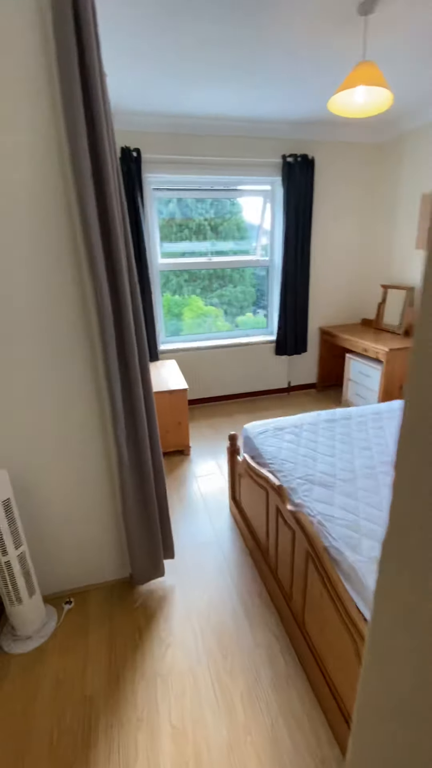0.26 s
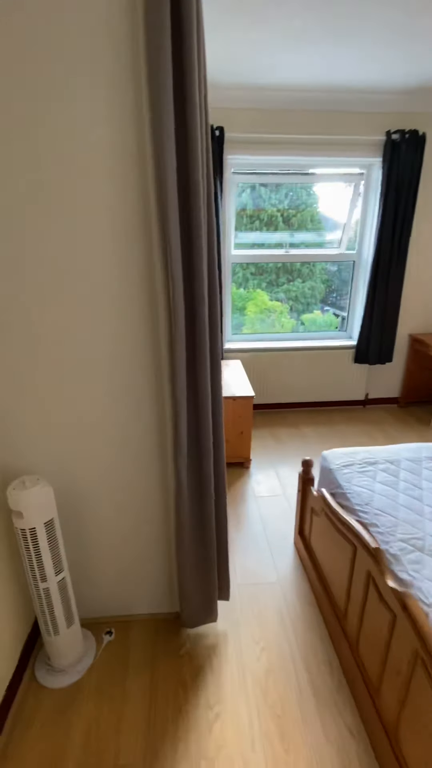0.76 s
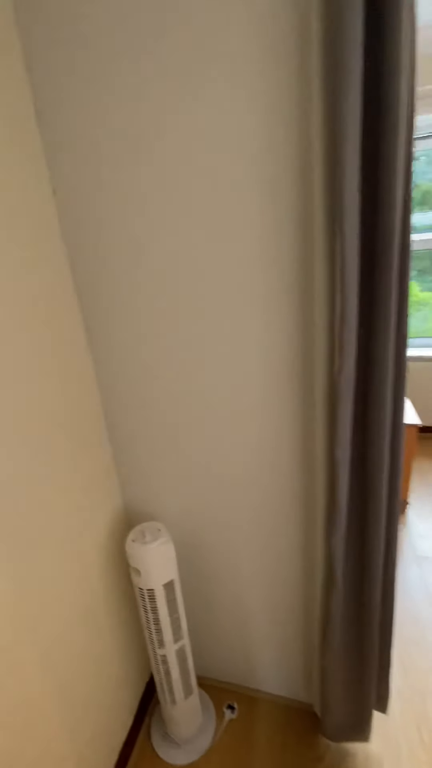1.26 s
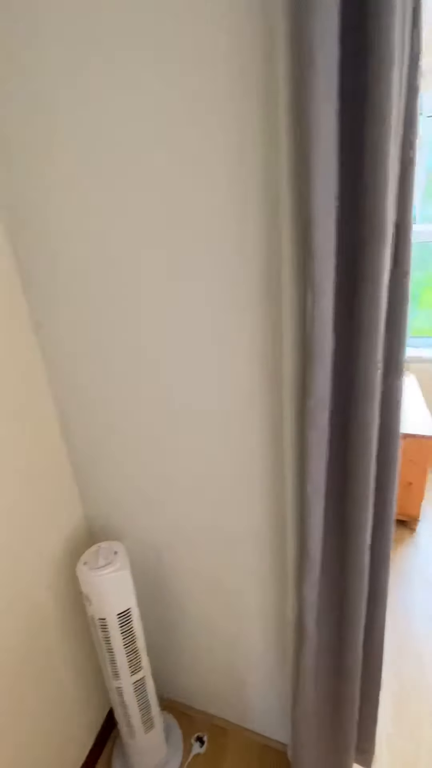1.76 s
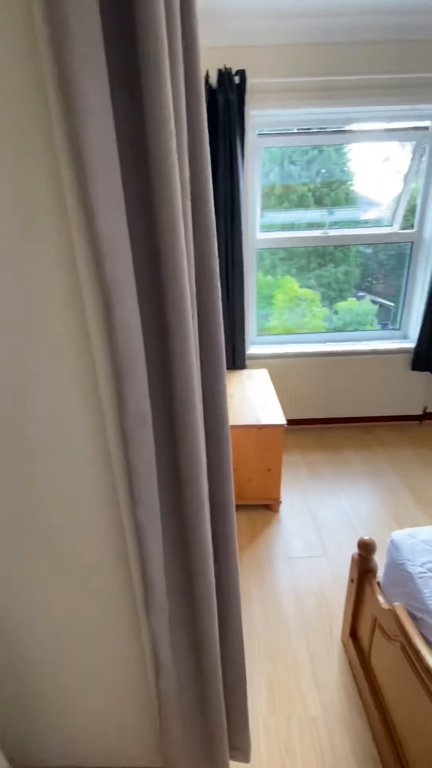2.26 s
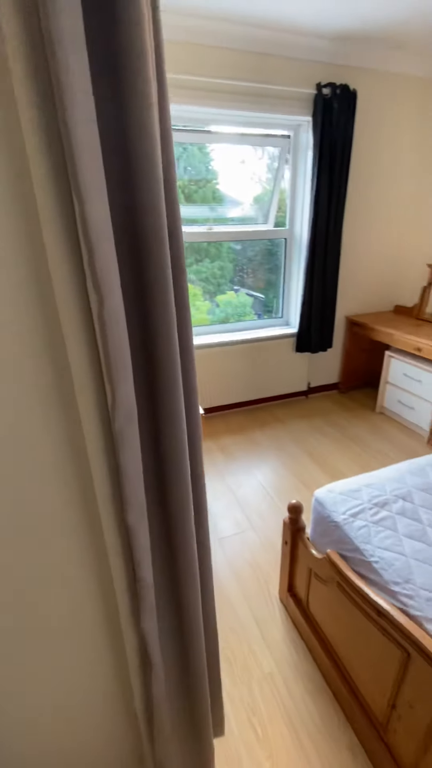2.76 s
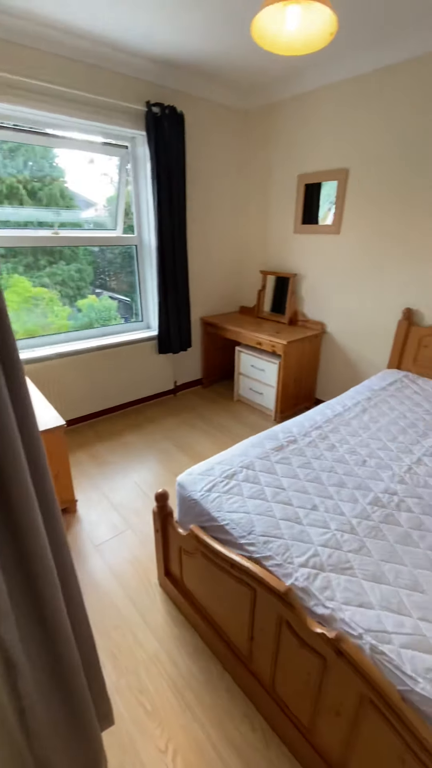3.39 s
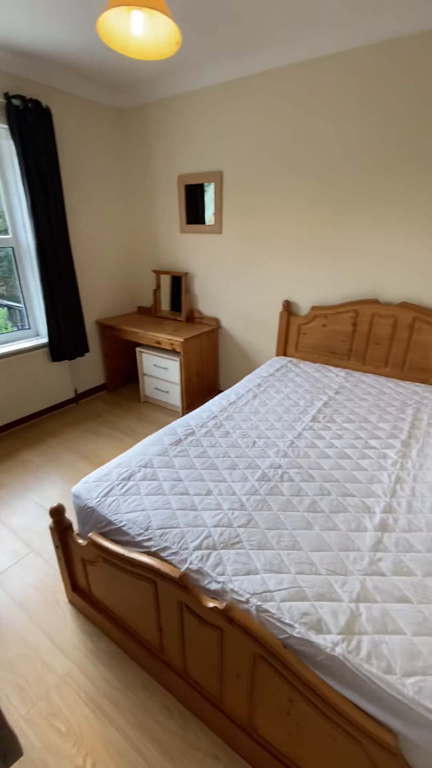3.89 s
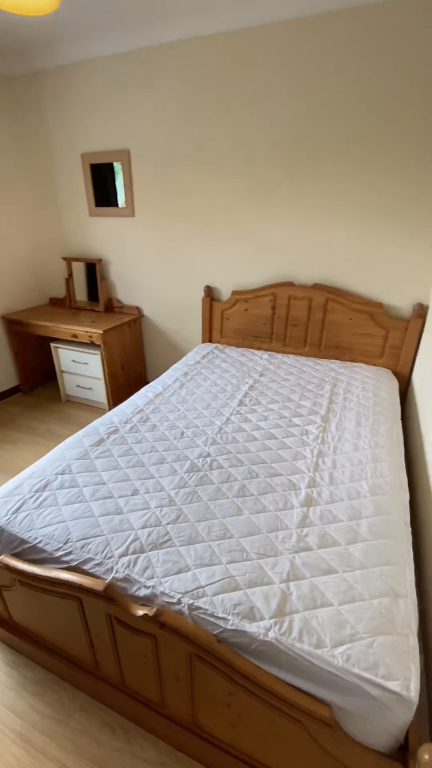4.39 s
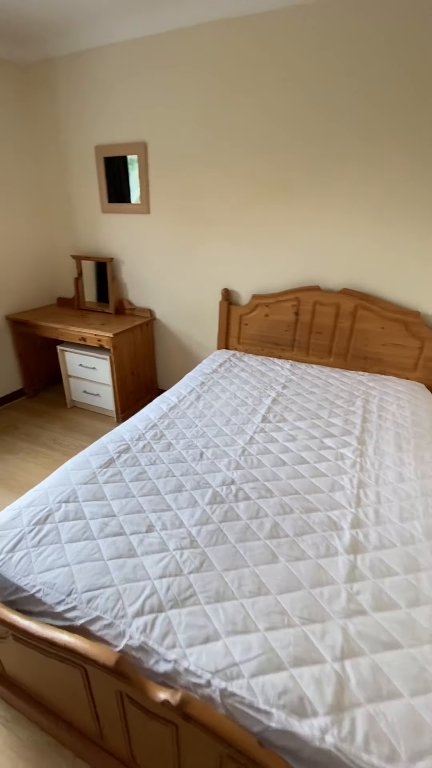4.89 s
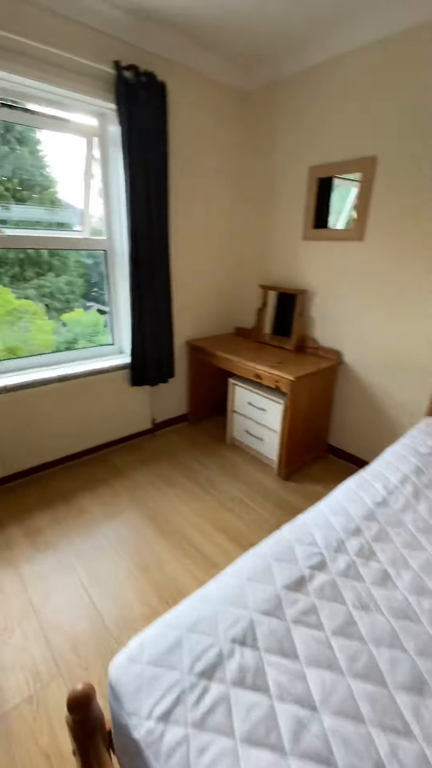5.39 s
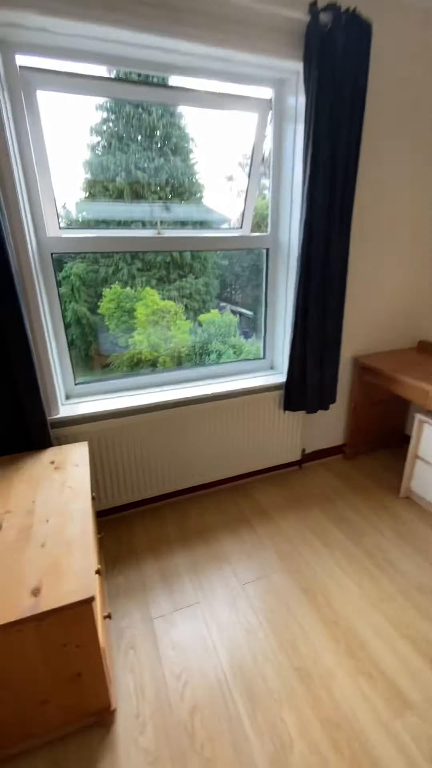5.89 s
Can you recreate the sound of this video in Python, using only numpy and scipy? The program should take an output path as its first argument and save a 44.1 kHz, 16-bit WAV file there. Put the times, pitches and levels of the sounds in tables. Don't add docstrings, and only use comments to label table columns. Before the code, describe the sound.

Soft-shoed footsteps knock and thump on a hollow laminate floor in a bare bedroom, pause, then resume, over faint distant traffic hum.

```python
import sys
import numpy as np
from scipy import signal
from scipy.fft import rfft, irfft, next_fast_len
from scipy.io import wavfile
from scipy.ndimage import uniform_filter1d

SR = 44100
rng = np.random.default_rng(int(sys.argv[2]) if len(sys.argv) > 2 else 0)


def nominal_scale(level):
    x = np.asarray(level, float) / 20
    return 10 ** x


def persist_wave(psi):
    counts = np.round(np.clip(psi, -1, 1) * 32767).astype(np.int16)
    wavfile.write(sys.argv[1], SR, np.atleast_2d(counts).T)


N = 270979

# f/Hz, level/dB
STREET_COLOUR = [(12, -30), (20, -11.5), (54, -1), (76, -10.5), (153, -13), (185, -19.5), (217, -17),
                 (291, -16), (324, -32), (497, -24), (632, -41), (945, -26), (1850, -43), (5530, -54.5),
                 (12500, -49.5), (15600, -72)]
# t/s, level/dB
CAR_PASSING = [
    (0, 0),
    (3.3, -2),
    (3.55, -3),
    (4.0, 1),
    (4.35, 2),
    (4.7, -1),
    (6.14, 0),
]
# f/Hz, time to fade 60 dB/s, level/dB
ROOM_RING = [(59, 0.8, -15.5), (150, 0.62, -13), (407, 0.35, -2.5), (965, 0.27, -5), (2700, 0.35, -5.5),
             (6370, 0.25, -9), (9900, 0.22, -14.5)]
# f/Hz, phase/rad
LEFT_LEAD = [(0, 0), (500, .25), (1210, 2.1), (1800, .6), (3000, 2.6), (4000, .5), (4550, 1.8), (4850, 3.2),
             (5200, 6.1), (7060, 7.5), (9300, 8), (11700, 9.5)]
# f/Hz, share/0-1
DIFFERENT_SHARE = [(60, 0.04), (150, 0), (300, 0.1), (550, 0.68), (1500, 0.98), (4200, 0.77), (4850, 0.53),
                   (5500, 0.49), (12000, 0.38)]
# f/Hz, level/dB
MIC_RESPONSE = [(20, -15), (33, -5), (45, 2), (8000, 1.58), (10000, -1), (11000, 0.5), (12200, -5),
                (12800, -10)]

# peak t/s, level/dB, time to fade 20 dB/s
HOUSE_SWAYS = [(.56, -62, -1.5), (.72, -55, 0), (.92, -47, 0.1), (1.28, -51, 0.55), (1.6, -45, 0.2),
               (1.83, -53, 0.9), (2.14, -54, 0), (2.68, -53, 0.3), (3.21, -56, .5), (3.56, -66.5, 3.5),
               (4.02, -62, 0.3), (5.06, -45, 0.04), (5.25, -46.5, .5), (5.85, -45, 0.24),
               (6.08, -46.5, 0.3)]
# t/s, level/dB
FLOOR_LOAD = [(0, -8), (.3, -10), (.7, 0), (2.5, 0), (2.95, -16), (3.2, -7), (3.45, -16), (4.75, -9.5),
              (5.1, -1), (5.55, -7), (5.85, 2.5), (6.14, 2)]
# f/Hz, level/dB
CLOTH_COLOUR = [(1470, -66), (2500, -6), (3960, -6), (4730, -7), (5150, -2), (5830, -5.5), (9300, -12.5),
                (10500, -11), (12000, -21), (15600, -28)]
# peak t/s, hiss level/dB, time to fade 20 dB/s, coarse rub over hiss/dB
LEG_SWINGS = [(0.0, -59, 0.18, 3), (.46, -61, 0.12, -0.5), (.83, -55.5, 0.41, -1.5), (1.52, -70.5, 0.83, 9),
              (1.999, -80, 0.42, 19.5), (2.3, -79, 0.07, 29), (2.49, -68, 0.27, -15), (2.601, -59, 0.14, 4),
              (2.93, -74, 0.05, 6.5), (3.08, -79, 0.02, 17), (4.5, -74.5, 0.09, 3.5),
              (4.83, -76.5, 0.23, 8.5), (5.06, -64.5, 0.15, 7), (5.23, -62, 0.21, 1.5),
              (5.4, -69.5, 0.2, 1), (5.76, -82, 0.21, 21), (5.92, -66, 0.35, -1.5), (6.14, -63, 0.31, 2.5)]
# peak t/s, level/dB, f/Hz, width/octaves, time to fade 20 dB/s
FLEX_CREAKS = [(.15, -71, 680, .15, .4), (1.56, -64, 1240, 0.095, .2), (1.52, -70, 3450, .08, 0.15),
               (2.93, -74.5, 3270, .1, .12), (3.29, -79, 3350, .09, .08), (3.22, -60, 1900, 0.55, 0.075),
               (3.65, -82, 3300, .2, .04), (4.47, -78, 3500, .17, .22), (4.5, -73.5, 5100, 0.44, -0.02),
               (1.85, -51, 750, .55, .08), (1.24, -50, 300, .25, .05), (2.5, -45, 142, .12, 0.11),
               (5.88, -48, 190, .2, .08), (6.068, -55, 11500, .06, 0.24), (5.12, -55, 1500, 0.5, 0.0639),
               (3.3, -60, 400, .5, .08), (5.79, -57, 5400, .15, .03), (5.23, -61, 5600, .08, .05),
               (2.07, -62, 770, .12, .06), (2.12, -62, 1000, .7, .12), (2.225, -57, 130, .3, .06),
               (.78, -66, 11000, .35, .04), (1.83, -50, 2500, .6, .025), (5.96, -62, 9500, .3, .08),
               (5.725, -57, 8500, .4, .055), (5.73, -47, 550, .5, .07), (5.97, -53, 250, .4, .12),
               (2.495, -50, 850, .5, .03), (.93, -62, 6000, .2, .15)]
# t/s, peak level/dB, start f/Hz, end f/Hz, length/s
SINGING_STRANDS = [(1.99, -47, 480, 425, .055), (2.03, -50, 800, 745, .07), (2.04, -53, 930, 850, .05),
                   (2.05, -52, 1010, 985, .04), (2.1, -57, 770, 680, .06), (2.15, -57, 760, 770, .04),
                   (2.165, -53, 300, 300, .035), (2.16, -55, 480, 560, .045), (2.205, -54, 310, 295, .045),
                   (1.985, -47, 990, 950, .04), (1.815, -46, 1050, 1000, .04), (1.83, -47, 800, 720, .035),
                   (1.1545, -32, 960, 910, .02), (1.18, -38, 560, 550, .025), (1.19, -40, 350, 330, .035),
                   (1.195, -44, 780, 760, .025), (1.233, -39, 270, 250, .016), (1.234, -34, 170, 140, .03),
                   (5.0715, -30, 710, 690, .011), (5.078, -35, 285, 270, .03), (5.08, -28, 135, 130, .024),
                   (5.1, -39, 660, 640, .028), (5.118, -40, 515, 490, .04), (5.12, -39, 305, 295, .025),
                   (5.2, -35, 170, 175, .03), (5.18, -41, 95, 92, .045), (3.18, -33, 300, 280, .03),
                   (3.181, -38, 470, 450, .024), (5.684, -51, 2620, 2580, .024), (5.8, -40, 520, 480, .014),
                   (5.81, -36, 110, 100, .03), (3.178, -30, 160, 145, .036), (3.172, -47, 1260, 1250, .02),
                   (3.04, -38, 160, 150, .045), (3.072, -55, 660, 650, .028), (1.162, -30, 190, 170, .016),
                   (5.072, -32, 480, 460, .011), (1.784, -39, 650, 640, .022), (.5685, -42, 560, 540, .02),
                   (5.128, -35, 150, 145, .025)]

# t/s, peak level/dB, f/Hz, left over right/dB
CRUSHED_GRIT = [(.2615, -60, 2500, 0), (1.3465, -46, 4500, 0), (2.676, -52, 8000, -2), (3.231, -45, 650, 0),
                (5.787, -42, 3200, 0), (5.794, -43, 2000, 0), (5.802, -41, 2800, 0), (5.815, -42, 2200, 0),
                (5.855, -39, 3000, 0), (1.829, -40, 2200, 0), (4.46, -66, 3400, 0), (4.51, -64, 3600, 0)]
# t/s, peak level/dB, f/Hz, left over right/dB
GRIT_TICKS = [(0.1287, -49.5, 2920, 0), (0.2627, -48.5, 3070, 0), (0.5697, -39.5, 2620, -5),
              (0.6303, -50, 6500, -2), (0.673, -55, 2600, 1), (0.72, -41, 5000, -6), (1.3471, -48, 4170, 0),
              (2.204, -48.5, 3050, 1), (2.531, -49, 5300, 7), (2.7927, -57.5, 3800, 8),
              (3.042, -56, 4290, 4), (3.641, -59, 5400, -0.5), (4.7583, -51.5, 4560, -1.0),
              (4.8224, -59, 6920, 0), (5.077, -42, 4500, 0), (5.1779, -35.5, 3100, 5.5),
              (5.435, -47.5, 4320, -8), (5.682, -36, 2510, 4), (5.7395, -43, 4930, -1.0),
              (5.8538, -36.5, 3070, -1.5), (6.058, -38.5, 6100, 9)]
# t/s, peak level/dB, slip rate f/Hz, length/s
RUBBER_SQUEAKS = [
    (1.979, -35, 870, 0.031),
    (1.9, -57, 860, 0.021),
    (1.82, -44, 1090, 0.021),
]
# f/Hz, level/dB
OVERTONE_LEVELS = [(400, -12), (900, -3), (1740, -2.5), (3500, 1), (5200, -10), (8000, -17)]
# t/s, peak level/dB, f/Hz, length/s
LOOSE_BOARDS = [(.467, -36, 176, 0.036), (.572, -31.5, 150, 0.032), (1.1555, -31.5, 545, 0.0097),
                (1.784, -30.5, 445, 0.024), (2.481, -40, 163, 0.025), (3.18, -35, 190.6, 0.025),
                (5.68, -48, 2600, 0.012), (5.683, -40, 603, 0.0093), (5.703, -34, 172, .036),
                (2.27, -38, 150, .035), (1.785, -38, 870, .02), (1.163, -34, 260, .014)]
# t/s, peak level/dB, f/Hz, time to fade 60 dB/s
SOLE_SLAPS = [(0.0044, -43.5, 5070, 0.07), (0.4672, -41.5, 2400, 0.098), (0.568, -34.5, 2700, 0.059),
              (0.7245, -42, 4300, 0.09), (1.1565, -29.5, 2170, 0.11), (1.3456, -44.5, 3800, 0.081),
              (1.826, -36.5, 2060, 0.087), (1.9773, -28, 2400, 0.095), (2.045, -46, 2150, 0.15),
              (2.2047, -41.5, 1970, 0.1), (2.261, -37, 2200, 0.1), (2.2607, -38, 4900, 0.18),
              (2.477, -45.5, 2550, 0.17), (2.532, -38, 4770, 0.087), (3.173, -48, 1500, 0.1),
              (4.8237, -47.5, 1800, 0.15), (4.825, -51.5, 5900, 0.16), (5.004, -47, 5850, 0.096),
              (5.0734, -29, 2330, 0.065), (5.1758, -40.5, 3830, 0.1), (5.2, -51.5, 5560, 0.17),
              (5.3293, -54.5, 5350, 0.15), (5.68, -42, 2700, 0.47), (5.7857, -47.5, 5000, 0.19),
              (5.797, -44, 2500, 0.14), (6.0576, -39.5, 6300, 0.1)]
# t/s, peak level/dB, f/Hz, width/octaves, time to fade 60 dB/s
SOLE_DRAGS = [(.974, -48, 9500, 0.84, 0.26), (1.1793, -38.5, 2150, 1, .26), (1.158, -41.5, 5400, 0.62, 0.4),
              (1.7826, -39.5, 1850, 0.83, 0.31), (1.782, -51.5, 6800, 0.5, 0.29),
              (2.045, -49, 900, 0.6, 0.41), (2.172, -46.5, 450, 0.6, 0.28), (2.665, -45, 5900, 0.69, 0.098),
              (3.0348, -42.5, 3860, .99, 0.25), (2.185, -49.5, 640, 0.34, .2),
              (5.073, -31.5, 700, 0.6, 0.22), (6.057, -35, 10600, 0.28, 0.17)]

# t/s, peak level/dB, board pitch f/Hz, hard edge over knock/dB
FOOT_KNOCKS = [(0.465, -37.5, 436, -14.5), (0.507, -56, 425, -2), (0.569, -35.5, 562, -30),
               (0.811, -45.5, 420, -12), (1.156, -25, 485, -3.5), (1.189, -32, 338, -9),
               (1.238, -42, 492, -24), (1.788, -32, 447, -8), (1.822, -43.5, 760, 2.5),
               (1.984, -37.5, 457, -2.5), (2.04, -43.5, 688, 0), (2.261, -47.5, 637, -7),
               (2.482, -38, 644, -4), (2.529, -44.5, 563, -23), (3.041, -45, 643, -28),
               (3.174, -35, 354, -4), (3.184, -26, 333, -14), (3.231, -42, 332, -3), (4.519, -60, 394, -11),
               (4.825, -45, 347, -4.5), (5.005, -42.5, 453, -14), (5.073, -24, 329, -7),
               (5.104, -31.5, 517, -9), (5.177, -39, 579, -26), (5.68, -31, 437, -23),
               (5.705, -33.5, 398, -31), (5.801, -34, 335, -14.5), (5.864, -53, 500, -20)]
# t/s, subfloor thump level/dB, beam boom level/dB
WEIGHT_LANDINGS = [(0.466, -34.5, -61), (0.507, -47, -54), (0.569, -31, -42), (0.624, -40, -43),
                   (0.811, -39, -58), (1.156, -35, -31.5), (1.186, -45, -41), (1.238, -40, -35),
                   (1.824, -46, -43), (1.983, -54.5, -53), (2.261, -37, -35.5), (2.48, -37, -65.5),
                   (2.689, -61, -42.5), (3.041, -47, -51), (3.172, -41, -39.5), (3.186, -41, -46),
                   (3.231, -52, -52), (3.819, -64, -48.5), (3.911, -67, -52), (4.519, -51.5, -63),
                   (4.824, -48.5, -46), (5.004, -44.5, -63), (5.072, -29, -35), (5.1, -27.5, -36),
                   (5.177, -41, -38), (5.241, -46, -33.5), (5.68, -36, -52), (5.705, -35, -46),
                   (5.788, -36, -31), (5.812, -36, -34)]
# multiple of the board pitch, level/dB, time to fade 60 dB/s
BOARD_TONES = [(.6, -5, 0.068), (.72, -7.5, 0.068), (.86, -5.5, 0.057), (1.01, -2, 0.076),
               (1.15, -2, 0.042), (1.32, -4.5, 0.031), (1.55, -3, 0.029)]
# f/Hz, level/dB, time to fade 60 dB/s
EDGE_TONES = [(693, -0.9, 0.04), (783, -0.5, 0.047), (940, -3, 0.064), (1052, 0.5, 0.032),
              (1273, -7, 0.035), (1530, -10, 0.026), (1850, -4, 0.014), (2200, -24, 0.0062)]
# f/Hz, level/dB, time to fade 60 dB/s
SUBFLOOR_TONES = [(110.3, -6.5, 0.16), (142.3, 1, 0.12), (173.7, -5.5, 0.13), (211.6, -6.5, 0.098),
                  (270.2, -7, 0.055)]
# f/Hz, level/dB, time to fade 60 dB/s
BEAM_TONES = [(47.1, -7.5, 0.63), (57.3, 1.5, 0.26), (70.3, -10, 0.11)]

KNOCK_PAN_DB, SCUFF_PAN_DB = 4, 0
SLOW_T = np.linspace(0, N / SR, num=1200)


def on_log(hz, table):
    table_hz, value = np.transpose(table)
    return np.interp(np.log(hz + 1), np.log(table_hz + 1), value)


def shape(x, gain):
    size = next_fast_len(x.shape[-1])
    hz = np.arange(size // 2 + 1) * SR / size
    return irfft(rfft(x, size) * gain(hz), size)[..., :x.shape[-1]]


def bell(hz, centre_hz, octaves):
    return np.exp(-.5 * (np.log2((hz + 1) / centre_hz) / octaves) ** 2)


def unit(x):
    return x / np.sqrt(np.mean(x ** 2))


def rise(t, rise_s):
    return 1 - np.exp(-t / rise_s)


def die_away(t, t60):
    return np.exp(-np.log(1000) * t / t60)


def walk(rate):
    k = int(SR / rate)
    steps = np.repeat(rng.standard_normal(N // k + 1), k)
    return uniform_filter1d(uniform_filter1d(steps, k), k)[:N]


def swells(s, db, fade_s, base_db):
    away = (SLOW_T - np.array(s)[:, None]) / np.maximum(fade_s, .02)[..., None]
    away = np.where(away < 0, -away, away / 1.16)
    power = nominal_scale(np.array(db)[:, None] - 20 * away) ** 2
    total = power.sum(axis=0) + nominal_scale(base_db) ** 2
    return np.interp(np.arange(N) / SR, SLOW_T, 10 * np.log10(total))


def slipping(gain):
    bursts_db = 3.0 * np.minimum(rng.exponential(size=N), 4) * (rng.random(N) < .05)
    return unit(shape(rng.standard_normal(N) * nominal_scale(bursts_db), gain))


def add(out, s, sound, pan_db):
    i = max(int(s * SR), 0)
    out[:, i:i + len(sound)] += sound[:N - i] * nominal_scale(np.array([[pan_db], [-pan_db]]) / 2)


def street():
    noise = shape(rng.standard_normal((2, N)), lambda f: nominal_scale(on_log(f, STREET_COLOUR)))
    swell = walk(0.92)
    flicker = [nominal_scale(1.2 * swell + 2.2 * walk(7)) for _ in range(10)]
    flicker[5] = flicker[5] * nominal_scale(np.interp(np.arange(N) / SR, *np.transpose(CAR_PASSING)))
    total = 0
    for k, gain in enumerate(flicker):
        total = total + shape(noise, lambda f: bell(f, 30 * 2. ** k, 0.32)) * gain
    return unit(total) * nominal_scale(-61)


def air_flutter():
    return unit(shape(rng.standard_normal((2, N)), lambda f: bell(f, 45, 1.13))) * nominal_scale(-69.5)


def walls(x):
    t, hop = np.arange(int(.5 * SR)) / SR, 32768
    noise, tails = rng.standard_normal((N // hop + 2, 2, len(t))), 0
    for hz, t60, db in ROOM_RING:
        band = shape(noise, lambda f: bell(f, hz, 0.56)) * die_away(t, t60) * rise(t, 0.0022)
        tails = tails + nominal_scale(db) * band * np.sqrt(14.5 / t60 / SR)
    x, out = np.pad(x, (hop, 2 * hop)), np.zeros((2, N + 4 * hop))
    window = np.sin(np.pi * np.arange(2 * hop) / (2 * hop))
    for k, tail in enumerate(tails):
        piece = x[k * hop:(k + 2) * hop] * window
        part = signal.fftconvolve(piece[None], tail, axes=1)
        out[:, k * hop:k * hop + part.shape[1]] += part
    return out[:, hop:hop + N]


def ports(near, field):
    same = shape(field[0], lambda f: np.sqrt(1 - on_log(f, DIFFERENT_SHARE)))
    other = shape(field[1], lambda f: np.sqrt(on_log(f, DIFFERENT_SHARE)))
    left, right = near + np.array([same + other, same - other])
    turn = lambda f: np.exp(.5j * np.interp(f, *np.transpose(LEFT_LEAD)))
    return np.array([shape(left, turn), shape(right, lambda f: 1 / turn(f))])


def house():
    rumble_db = swells(*np.transpose(HOUSE_SWAYS), -71)
    load_db = np.interp(SLOW_T, *np.transpose(FLOOR_LOAD))
    s, thump_db, _ = np.transpose(WEIGHT_LANDINGS)
    settle_t, settle_s = s + 0.089, 0.16
    drone_db = swells(settle_t, thump_db - 24, settle_s * np.ones(len(s))[:, None][:, 0], -59 + 0.62 * load_db)
    murmur_db = swells(settle_t, thump_db - 31, settle_s * np.ones(len(s)), -60.5 + load_db)
    rumble = slipping(lambda f: bell(f, 56.5, 0.2)) * nominal_scale(rumble_db - 5.5 + 1.2 * walk(3.9))
    drone = slipping(lambda f: bell(f, 147.0, 0.64)) * nominal_scale(drone_db - 5 + 0.87 * walk(3.5))
    murmur = slipping(lambda f: bell(f, 450, 0.97)) * nominal_scale(murmur_db - 4.5 + 1.3 * walk(14))
    return rumble + drone + murmur


def clothes():
    s, db, fade_s, rub_db = np.transpose(LEG_SWINGS)
    hiss_db = swells(s, db, fade_s, -84.5)
    coarse_db = swells(s, db + rub_db, fade_s, -93.5)
    hiss = slipping(lambda f: nominal_scale(on_log(f, CLOTH_COLOUR))) * nominal_scale(hiss_db - 2.5 + 2.0 * walk(25.06))
    rub = slipping(lambda f: bell(f, 1950, 1.0)) * nominal_scale(coarse_db - 7.0 + 2.0 * walk(25.96))
    return hiss + rub


def creaks():
    out = np.zeros((2, N))
    for s, db, hz, octaves, fade_s in FLEX_CREAKS:
        hiss, grip = rng.standard_normal((2, 32768))
        start = max(s - .3, 0)
        away = np.abs(np.arange(len(hiss)) / SR + start - s) / max(fade_s, .01)
        stutter_db = 2.5 * unit(uniform_filter1d(grip, size=500))
        friction = unit(shape(hiss, lambda f: bell(f, hz, octaves)))
        add(out, start, friction * nominal_scale(db + stutter_db - 20 * away ** 1.27), SCUFF_PAN_DB)
    return out


def strands():
    out = np.zeros((2, N))
    for s, db, from_hz, to_hz, length_s in SINGING_STRANDS:
        along = np.linspace(0, 1, num=int(length_s * SR))
        waver = unit(uniform_filter1d(rng.standard_normal(8192), size=300))[:len(along)]
        hz = (from_hz + (to_hz - from_hz) * along) * (1 + .025 * waver)
        tone = np.sin(2 * np.pi * np.cumsum(hz) / SR) * np.sin(np.pi * along ** 0.7)
        add(out, s, nominal_scale(db) * tone, KNOCK_PAN_DB * min(from_hz / 450, 1))
    return out


def ticks(table):
    out, t = np.zeros((2, N)), np.arange(512) / SR
    for s, db, hz, pan_db in table:
        crack = rng.standard_normal(len(t))
        crack[12] += 12
        crack = unit(shape(crack, lambda f: bell(f, hz, 0.6) + 0.2 * bell(f, 13000, 0.3)))
        crack = crack * np.exp(-t / .0014) / 2
        add(out, s - .0006, nominal_scale(db - 3) * crack, pan_db)
    return out


def squeaks():
    out, t = np.zeros((2, N)), np.arange(4096) / SR
    stutter_db = 4 * np.sin(2 * np.pi * 90 * t)
    for s, db, hz, length_s in RUBBER_SQUEAKS:
        waver = unit(uniform_filter1d(rng.standard_normal(len(t)), size=200))
        phase = 2 * np.pi * np.cumsum(hz * (1 + 0.013 * waver)) / SR
        stack = sum(nominal_scale(on_log(k * hz, OVERTONE_LEVELS)) * np.sin(k * phase) for k in range(1, 9))
        fade = rise(t, 0.0033) * np.exp(-(t / length_s) ** 2)
        add(out, s, nominal_scale(db - 7.0 + stutter_db) * stack * fade, SCUFF_PAN_DB)
    return out


def drums():
    out = np.zeros((2, N))
    for s, db, hz, length_s in LOOSE_BOARDS:
        t = np.arange(int(length_s * SR)) / SR
        tone = np.sin(2 * np.pi * hz * t) * np.sqrt(np.sin(np.pi * t / length_s))
        add(out, s, nominal_scale(db) * tone, KNOCK_PAN_DB * min(hz / 450, 1))
    return out


def scuffs():
    out, t = np.zeros((2, N)), np.arange(12288) / SR
    slaps = [(s, db, hz, 0.78, t60, 0.0025) for s, db, hz, t60 in SOLE_SLAPS]
    drags = [(*row, 0.0077) for row in SOLE_DRAGS]
    for s, db, hz, octaves, t60, rise_s in slaps + drags:
        hiss, grip = rng.standard_normal((2, len(t)))
        grains = nominal_scale(3.36 * unit(uniform_filter1d(grip, size=120)))
        hiss = unit(shape(hiss, lambda f: bell(f, hz, octaves))) * grains
        add(out, s - .001, nominal_scale(db - 7.5) * hiss * rise(t, rise_s) * die_away(t, t60), SCUFF_PAN_DB)
    return out


def ring(modes, scale, push_s, spread_db, size):
    t = np.arange(size) / SR
    f, db, t60 = np.array(modes, float).T[:, :, None]
    pitch_chance, level_chance = rng.standard_normal((2, len(f), 1))
    f = f * scale * (1 + 0.037 * pitch_chance)
    tones = nominal_scale(db + spread_db * level_chance) * np.sin(2 * np.pi * f * t) * die_away(t, t60)
    x = tones.sum(axis=0) * rise(t, push_s)
    return x / np.abs(x).max()


def footfalls():
    out, t = np.zeros((2, N)), np.arange(4096) / SR
    for s, knock_db, hz, edge_db in FOOT_KNOCKS:
        rattle = unit(shape(rng.standard_normal(len(t)), lambda f: bell(f, hz, 0.72)))
        rattle = rattle * rise(t, 0.0014) * np.exp(-t / 0.016)
        board = ring(BOARD_TONES, hz, 0.002, 2.4, size=4096)
        edge = ring(EDGE_TONES, 0.98, 0.00079, 3.2, size=4096)
        add(out, s, nominal_scale(knock_db - 7.5) * rattle, KNOCK_PAN_DB)
        add(out, s - .0008, nominal_scale(knock_db - 6) * board, KNOCK_PAN_DB)
        add(out, s - .0008, nominal_scale(knock_db + edge_db + 4.5) * edge, KNOCK_PAN_DB)
    for s, thump_db, boom_db in WEIGHT_LANDINGS:
        thump = ring(SUBFLOOR_TONES, 1, 0.0084, 2.97, size=8192)
        boom = ring(BEAM_TONES, 0.908, 0.012, 3.6, size=12288)
        add(out, s + 0.0029, nominal_scale(thump_db + 1.0) * thump, KNOCK_PAN_DB / 3)
        add(out, s + 0.0069, nominal_scale(boom_db - 0.5) * boom, 0)
    return out


def scene():
    open_air = footfalls() + scuffs() + ticks(GRIT_TICKS) + clothes() + house()
    covered = drums() + squeaks()
    echo = walls((open_air + nominal_scale(-10) * covered).mean(axis=0))
    close = creaks() + strands() + ticks(CRUSHED_GRIT)
    field = nominal_scale(2.5) * echo + street()
    return ports(open_air + covered + close, field) + air_flutter()


def top_cut(x):
    return signal.sosfilt(signal.butter(12, 15800, fs=SR, output="sos"), x)


def record(dry):
    mid = shape(dry[0] + dry[1], lambda f: nominal_scale(on_log(f, MIC_RESPONSE))) / 2
    side = shape(dry[0] - dry[1], lambda f: nominal_scale(on_log(np.minimum(f, 10000), MIC_RESPONSE))) / 2
    return top_cut(np.array([mid + side, mid - side]))


dry = scene()
out = record(dry)
persist_wave(out)
```